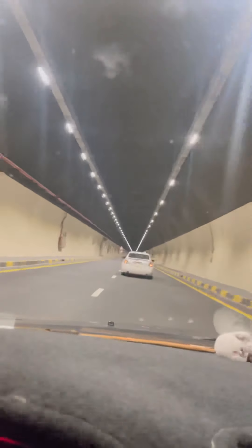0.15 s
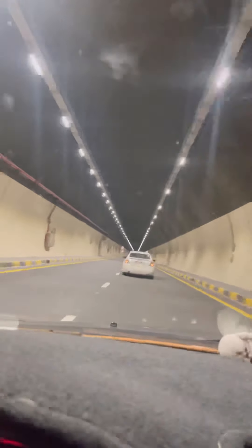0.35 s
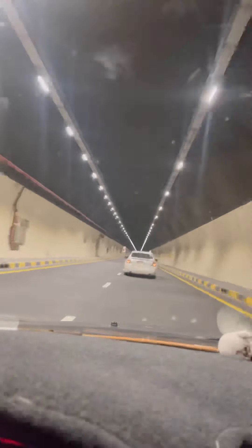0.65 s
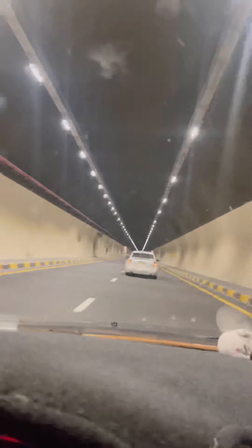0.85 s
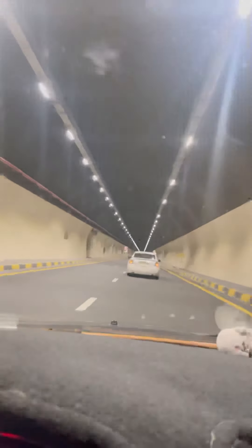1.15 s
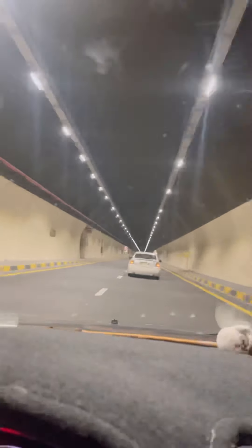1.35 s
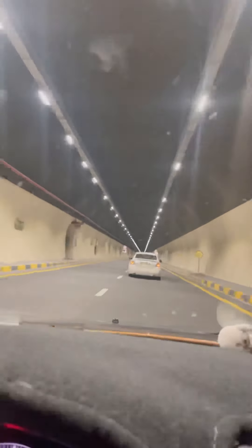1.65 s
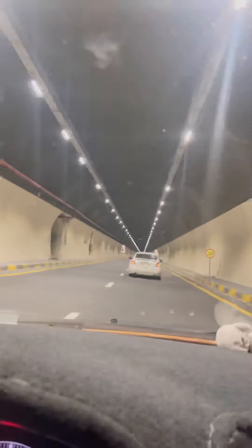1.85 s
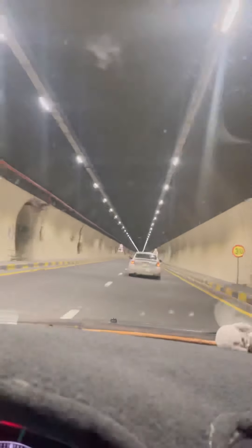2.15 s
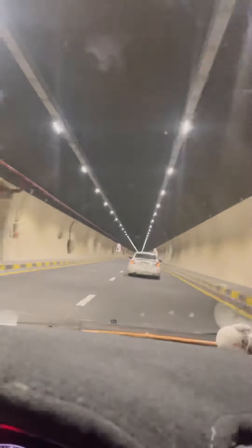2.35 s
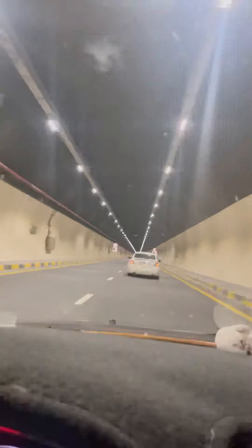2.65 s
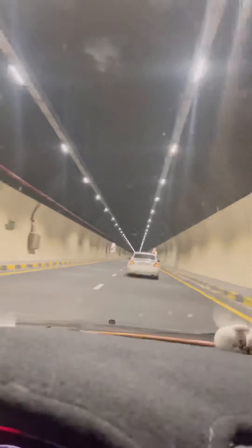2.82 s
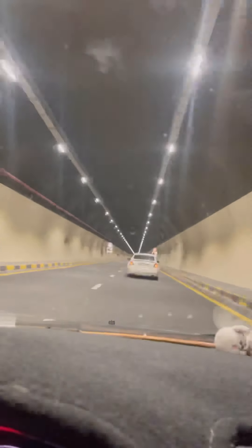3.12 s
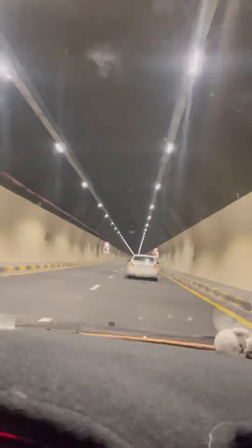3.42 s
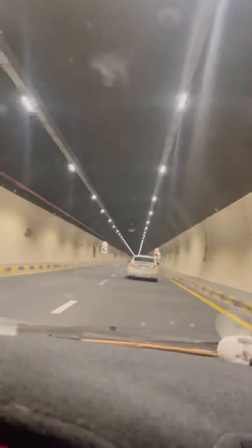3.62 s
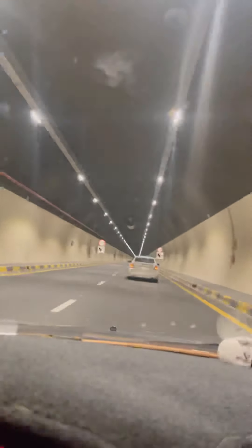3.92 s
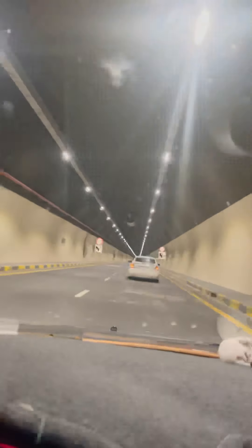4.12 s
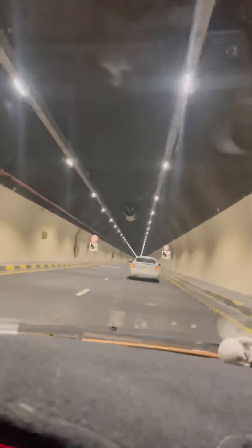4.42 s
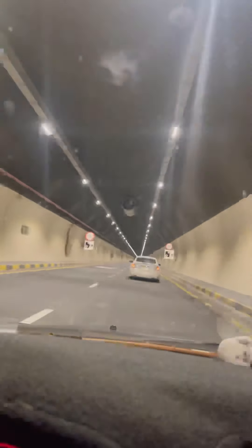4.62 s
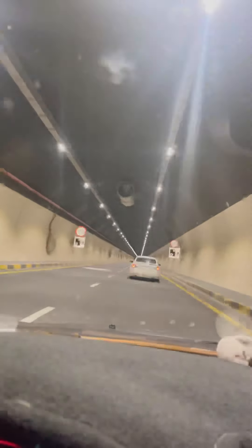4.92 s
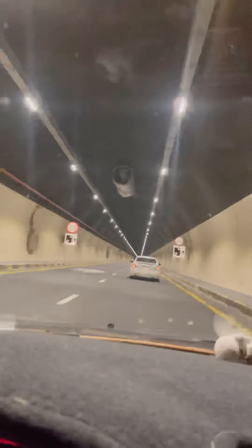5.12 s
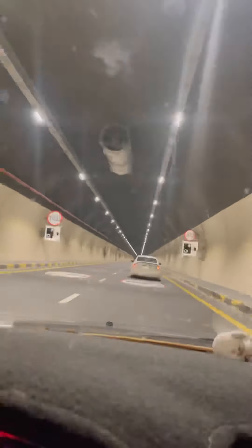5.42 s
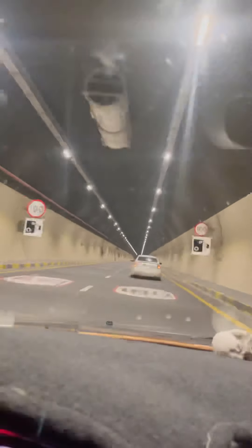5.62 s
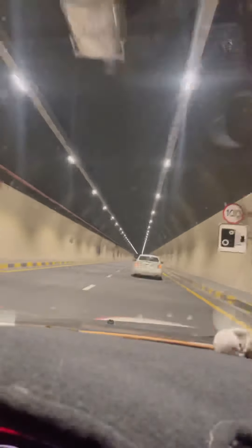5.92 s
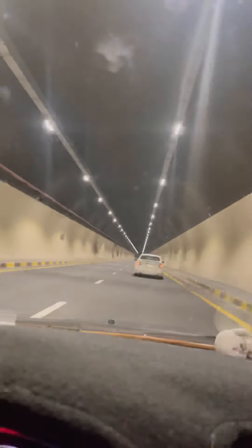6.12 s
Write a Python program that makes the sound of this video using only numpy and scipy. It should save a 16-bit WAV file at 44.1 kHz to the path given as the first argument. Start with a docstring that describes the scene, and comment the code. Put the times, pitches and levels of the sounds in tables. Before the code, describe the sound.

Continuous bass-heavy driving rumble fills a closed car cabin, wavering with the asphalt, with dull thumps, a humming engine and wheels, and only a thin soft hiss on top. A faint airy whine slowly grows as a ceiling fan approaches and passes overhead late. The microphone is close to the dashboard, catching small plastic ticks, slight rubbing, then a brief hollow rattle and snap around six seconds.

```python
"""A deep, uneven rumble runs throughout: a car in a long road tunnel, heard from behind the windscreen.
Asphalt drives shaped noise for floor boom, panel drone and tyre roar; ridges add short low jolts.
Engine and wheels hum as wandering harmonics. A whine, perhaps a ceiling fan, grows until it passes overhead.
Close by, plastic clicks as ringing modes and something brushes softly as grainy noise.
Near the end the dashboard knocks in short resonant bursts and a clip snaps."""
import sys
import numpy as np
from scipy import signal
from scipy.fft import rfft, irfft, next_fast_len
from scipy.io import wavfile
from scipy.ndimage import uniform_filter1d

SR = 44100
rng = np.random.default_rng(int(sys.argv[2]) if len(sys.argv) > 2 else 0)


def transcribe(signal):
    """Save signal, clipped to [-1, 1], as a 16-bit WAV file at the path in sys.argv[1]."""
    frames = np.atleast_2d(signal).T
    limited = np.clip(frames, -1, 1)
    pcm = np.round(limited * 32767).astype(np.int16)
    wavfile.write(sys.argv[1], SR, pcm)


N = 276066
TIME = np.arange(N) / SR
HZ = np.maximum(np.fft.rfftfreq(next_fast_len(N, True), 1 / SR), 1)
SIDES = np.array([[1], [-1]])  # left, right


def from_db(db):
    """Decibels to gain."""
    return 10 ** (np.asarray(db) / 20)


def rms_one(x):
    """Scale to unit power."""
    return x / np.sqrt(np.mean(x ** 2) + 1e-20)


def in_time(rows):
    """A curve of (time, value) joined by straight lines at every sample."""
    seconds, value = np.transpose(rows)
    return np.interp(TIME, seconds, value)


def at_hz(points):
    """A table joined by straight lines over log frequency."""
    hz, value = np.transpose(points)
    return np.interp(np.log(HZ), np.log(hz), value)


def colour(points):
    """Gain of a spectrum table, falling steeply beyond its ends."""
    low_hz, high_hz = points[0][0], points[-1][0]
    skirts = np.minimum(HZ / low_hz, 1) * np.minimum(high_hz / HZ, 1)
    return from_db(at_hz(points)) * skirts ** 6


def resonance(hz, width_hz):
    """Gain of a resonance with steep skirts, halved one width away from its centre."""
    return 1 / (1 + ((HZ - hz) / width_hz) ** 2)


def white(count):
    """Spectra of unrelated white noises."""
    return rng.standard_normal((count, len(HZ))) + 1j * rng.standard_normal((count, len(HZ)))


def drift(rate_hz):
    """Random curve of unit power that varies at about the given rate."""
    return rms_one(irfft(white(count=1)[0] * resonance(0, rate_hz))[:N])


def cabin_noise(gain):
    """Stereo noise of a given colour: alike on both sides in the bass, diffuse in the treble."""
    # how alike the two ears of the microphone are: pitch_hz, likeness (0 to 1)
    likeness = [(40, 0.99), (220, 0.99), (400, 0.98), (620, 0.86), (1300, 0.87), (1900, 0.59), (2300, 0.43),
                (2700, 0.27), (5000, 0.027)]
    # level difference between the ears: pitch_hz, left_minus_right_db
    balance = [(35, -4.5), (75, 2), (140, 1.5), (220, -0.2), (400, 2.5), (600, 3.5), (850, 2.5),
               (1100, -0.5), (3000, 0.5), (5000, -1)]
    # phase difference between the ears: pitch_hz, left_leads_rad
    lead = [(200, 0), (450, -0.34), (750, -0.47), (1100, -0.68), (1500, 0.78), (1950, 0.16), (2400, 0.72),
            (3000, -0.36)]
    mid, side = white(count=2)
    alike = at_hz(likeness)
    pair = np.sqrt(1 + alike) * mid + np.sqrt(1 - alike) * side * SIDES
    ear_gain = from_db(SIDES * at_hz(balance) / 2)
    ear_phase = np.exp(1j * SIDES * at_hz(lead) / 2)
    return rms_one(irfft(pair * ear_gain * ear_phase * gain)[:, :N])


def close_by(x):
    """A small source next to the microphone: its treble reaches the two ears out of step."""
    # pitch_hz, left_leads_rad
    close_lead = [(6300, 0), (8000, 1.5), (9400, 3.1), (10200, 4.2), (11400, 6)]
    spectrum = rfft(x, 2 * (len(HZ) - 1))
    return irfft(spectrum * np.exp(1j * SIDES * at_hz(close_lead) / 2))[:, :N]


def steady(x, seconds):
    """Even out a noise to unit power over a sliding window."""
    power = uniform_filter1d(np.mean(x ** 2, axis=0), max(int(seconds * SR), 1))
    return x / np.sqrt(power + 1e-12)


def below(x, hz):
    """The part of a sound under the given frequency."""
    return signal.sosfiltfilt(signal.butter(2, hz, fs=SR, output="sos"), x)


def jolted(boom):
    """Each ridge heaves the floor for a cycle or two and briefly unloads the wheel."""
    # ridges in the asphalt that jolt the floor: centre_s, peak_db, pitch_hz
    ridges = [(0.224, -8, 94), (0.543, -16.5, 80.4), (0.840, -9.5, 71), (1.092, -10.5, 74.5),
              (2.729, -11, 66.6), (3.67, -10.5, 78), (3.946, -9.5, 70), (4.05, -9, 99.3), (4.825, -12, 80),
              (4.929, -12, 64), (5.74, -9, 56), (5.891, -8.5, 56), (6.226, -9.5, 78)]
    jolt_s = 0.013  # from the peak down to 1/e on either side
    unload = 0.43  # share of the boom's amplitude lost at the peak
    out = boom.copy()
    for centre_s, peak_db, pitch_hz in ridges:
        near = slice(*np.searchsorted(TIME, [centre_s - .06, centre_s + .06]))
        age = TIME[near] - centre_s
        lift = np.exp(-(age / jolt_s) ** 2)
        thump = from_db(peak_db) * lift * np.cos(2 * np.pi * pitch_hz * age)
        out[:, near] = out[:, near] * (1 - unload * lift) + thump
    return out


def body(road_db):
    """Uneven asphalt makes the floor boom and the panels drone; the deepest part surges on its own."""
    # spectrum of the floor boom: pitch_hz, density_db (relative, per Hz)
    boom_spectrum = [(16, -33), (25, -22), (31, -15.5), (39, -5.5), (50, -1.5), (68, 1), (86, -1),
                     (104, .5), (130, -2.5), (146, -10), (200, -30)]
    # spectrum of the panel drone: pitch_hz, density_db (relative, per Hz)
    drone_spectrum = [(110, -16.5), (148, -5), (160, 5), (180, 2.5), (203, -5.5), (222, -10), (238, -8.5),
                      (270, -7), (315, -11), (380, -29), (600, -69.5)]
    # long dips in the road make the body heave, shifting the deep boom: time_s, change_db
    heave = [(0, 0.5), (0.9, -2.5), (1.6, 3), (2.3, -1), (3.4, 2), (4.1, -2.2), (4.7, 1.5), (5.3, 3),
             (5.75, 2), (6.2, 4)]
    # changes in the panels' drone: time_s, change_db
    panels = [(0, 0.5), (0.4, 0), (0.6, 0.5), (1.15, -0.5), (1.45, -0.5), (1.75, 0), (2.2, -0.5), (2.7, 1),
              (3.02, -0.5), (3.2, 2), (3.6, 0), (4.0, -2), (4.4, -1), (4.83, 2.5), (5.15, -1), (5.5, -0.5),
              (6.25, 1.5)]
    heave_hz = 68  # the heave acts below this
    # level on usual asphalt, and dB gained per dB of roughness
    boom_db, boom_follows = -20, 1.7
    drone_db, drone_follows = -25.5, 1.3

    boom = steady(cabin_noise(colour(boom_spectrum)), seconds=0.18)
    boom = from_db(boom_db + boom_follows * road_db) * boom
    deep = below(boom, heave_hz)
    heaving = from_db(in_time(heave)) * deep + (boom - deep)

    drone = steady(cabin_noise(colour(drone_spectrum)), seconds=.25)
    drone = from_db(drone_db + drone_follows * road_db + in_time(panels)) * drone
    return jolted(heaving) + drone


def hum(base_hz, orders, wander, flutter_db):
    """Multiples of a slightly wandering rotation, each fluttering in strength."""
    turns = np.cumsum(base_hz * (1 + wander * drift(0.98))) / SR
    out = np.zeros(N)
    for multiple, level_db in orders:
        tone = np.sin(2 * np.pi * (multiple * turns + rng.random()))
        out += from_db(level_db) * rms_one(from_db(flutter_db * drift(0.7)) * tone)
    return out


def drivetrain():
    """The engine's firing, stronger under load, and the turning of slightly uneven wheels."""
    # harmonics of the firing: multiple, level_db (before the load)
    engine_orders = [(2, -37), (3, -38), (4, -44), (5, -52)]
    # harmonics of the wheel rotation: multiple, level_db
    wheel_orders = [(4, -33), (6, -29), (19, -44)]
    # the driver leans on the throttle: time_s, change_db
    load = [(0, -12.5), (0.9, -1), (1.9, -2.5), (3.4, 0), (4.4, -1.2), (6.25, 6)]
    firing_hz, wheel_hz = 77.8, 13.33
    engine = from_db(in_time(load)) * hum(firing_hz, engine_orders, wander=.003, flutter_db=3.0)
    wheels = hum(wheel_hz, wheel_orders, wander=0.0033, flutter_db=2.0)
    return (engine + wheels) * from_db(SIDES * 0.36)  # slightly to the left


def wavering(x, share):
    """Let the pitch of a stereo sound wander by a small share around its mean."""
    sway = drift(1.5)
    warped = TIME + np.cumsum(share * (sway - sway.mean())) / SR
    return np.array([np.interp(warped, TIME, side) for side in x])


def unsteady_top(x):
    """Vary the level of a hiss's top quickly at random."""
    spread_db, rate_hz, split_hz = 1.8, 35, 4600
    low = below(x, split_hz)
    return low + from_db(spread_db * drift(rate_hz)) * (x - low)


def tyres(road_db):
    """Tread noise rings in the cabin and swells on rough asphalt; its hiss ignores the road
    and is slightly unsteady above 4.6 kHz."""
    # spectrum of the roar: pitch_hz, density_db (relative, per Hz)
    roar_spectrum = [(230, -42), (320, 0.5), (385, 1), (455, -4), (520, -4), (580, -7.5), (780, -10),
                     (920, -13.5), (1200, -23), (2000, -54)]
    # spectrum of the hiss: pitch_hz, density_db (relative, per Hz)
    hiss_spectrum = [(600, -11), (1020, 5), (1170, -0.5), (1380, 0.5), (1750, -8.5), (2250, -9.5),
                     (2750, -13.5), (3400, -19), (4200, -24.5), (5200, -33.5), (6700, -35.5), (8200, -54.5),
                     (12000, -38.5)]
    # cabin and window resonances: pitch_hz, width_hz, level_db (against the roar), left_minus_right_db
    cabin = [(541.3, 11, -11, -1.5), (707.8, 15, -14.5, 2.5), (862, 37, -13.5, 0.5), (1325, 40, -28, 0.5),
             (502, 9.3, -15.5, 3), (379.2, 12, -10, 0.5), (314.6, 6.4, -12, 0.5)]
    # patches of asphalt that excite one resonance: centre_s, rise_db, resonance number (from 0)
    swells = [(0.72, 5.5, 1), (1.22, 6, 0), (1.8, 3.5, 2), (2.1, 5, 1), (6.15, 4, 2), (6.15, 4, 3)]
    # the roar above the growl as the surface changes: time_s, change_db
    tread = [(0, 0.5), (0.6, -2), (1.3, 2), (2.2, 0), (3.2, 1), (3.9, -2.5), (4.6, -2.5), (5.3, 0.5),
             (6.25, -0.5)]
    # the roar's low growl: time_s, change_db
    growl_curve = [(0, 0.5), (0.35, 3.5), (0.45, 2), (0.55, 6.5), (0.75, 2), (1.2, 0), (1.45, -7),
                   (1.6, -3), (2.0, 1.5), (2.8, 1), (3.2, -1), (3.62, 1), (3.92, -2), (4.3, 3), (4.55, 0.5),
                   (4.82, 3.5), (5.2, 1), (5.39, -3.5), (5.54, 2), (5.8, -1.5), (6.12, 3.5), (6.25, -0.5)]
    swell_s = 0.33  # from the peak down to 1/e on either side
    ring_wander = 0.01078  # share by which the resonances wander in pitch
    growl_hz = 444  # upper edge of the growl
    roar_db, roar_follows = -33.5, 0.47  # level on usual asphalt, dB gained per dB of roughness
    hiss_db = -44  # before its top is varied

    roar = steady(cabin_noise(colour(roar_spectrum)), seconds=0.27)
    for number, (hz, width_hz, level_db, pan_db) in enumerate(cabin):
        swell_db = np.zeros(N)
        for centre_s, rise_db, which in swells:
            if which == number:
                swell_db += rise_db * np.exp(-((TIME - centre_s) / swell_s) ** 2)
        ring = steady(cabin_noise(resonance(hz, width_hz)), seconds=0.39)
        ring = wavering(ring, ring_wander)
        roar = roar + from_db(level_db + swell_db + SIDES * pan_db / 2) * ring
    roar = from_db(roar_db + roar_follows * road_db) * rms_one(roar)

    growl = below(roar, growl_hz)
    upper = roar - growl
    hiss = from_db(hiss_db) * unsteady_top(cabin_noise(colour(hiss_spectrum)))
    return from_db(in_time(growl_curve)) * growl + from_db(in_time(tread)) * upper + hiss


def fan():
    """A narrow airy whine that carries down the tunnel, and a wide air rush that fades faster with distance."""
    # spectrum of the rushing air: pitch_hz, density_db (relative, per Hz)
    rush_spectrum = [(800, -2), (1300, 3.5), (2500, -10), (4500, -24), (8000, -34)]
    speed_m_per_s, pass_s, height_m = 18, 5.85, 8.2
    overhead_db, loss_db_per_doubling = -55, 2.5  # the tunnel carries the whine, so it fades slowly
    flutter_db = 1.8
    rush_db = -52  # right below the fan
    distance_m = np.hypot(height_m, speed_m_per_s * (TIME - pass_s))
    nearness = height_m / distance_m
    whine_db = overhead_db + loss_db_per_doubling * np.log2(nearness) + flutter_db * drift(6)
    whine = resonance(hz=2305, width_hz=31) + from_db(-9.0) * resonance(hz=2150, width_hz=130)
    rush = from_db(rush_db) * nearness * cabin_noise(colour(rush_spectrum))
    return from_db(whine_db) * cabin_noise(whine) + rush


def plastic():
    """Each click is a crack that rings the part's modes; nearby surfaces scatter a short tail."""
    # plastic trim clicking: start_s, level_db (before a common 10 dB cut)
    clicks = [(0.114, -65), (1.932, -55), (2.27, -68), (2.715, -64), (3.057, -68), (5.315, -58),
              (5.3893, -35), (5.3906, -36), (5.403, -54), (6.222, -60)]
    # modes of the plastic part: pitch_hz, level_db (within the click), t60_s
    part_modes = [(1800, -1.5, .012), (2300, 0, .014), (2740, -1.5, 0.027), (3820, 1, .02),
                  (4330, 2, 0.018), (5730, -0.5, 0.02), (6570, 2, 0.018), (7420, -0.5, 0.022),
                  (8300, 2, 0.018), (8870, 6.5, 0.017), (9650, -1, 0.021), (10160, 7, 0.019),
                  (11420, 5, .02)]
    crack_db, crack_t60_s = 9, .007  # the contact itself, within the click
    scatter_db, scatter_t60_s = -4, 0.063  # its spray off nearby surfaces
    t = TIME[:SR // 8]
    out = np.zeros(N + len(t))
    for start_s, level_db in clicks:
        modes = np.zeros(len(t))
        for hz, mode_db, t60_s in part_modes:
            modes += from_db(mode_db - 60 * t / t60_s) * np.sin(2 * np.pi * (hz * t + rng.random()))
        crack = from_db(crack_db - 60 * t / crack_t60_s)
        scatter = from_db(scatter_db - 60 * t / scatter_t60_s)
        burst = (crack + scatter) * rng.standard_normal(len(t))
        start = round(start_s * SR)
        out[start:start + len(t)] += from_db(level_db - 10.0) * (modes + burst)
    return close_by(out[:N])


def brushes():
    """Friction hiss, grainy from catching fibres, that swells and fades with each stroke."""
    # soft strokes on fabric: centre_s, half_s (peak to 1/e), peak_db, top_hz
    strokes = [(1.3, 0.09, -68.5, 8000), (1.35, 0.04, -65, 11000), (1.43, 0.062, -57, 11000),
               (3.79, .04, -73, 7060), (4.426, 0.01, -63.5, 5800), (4.452, 0.026, -61.5, 5800),
               (4.8, 0.077, -73, 7200), (5.33, 0.039, -67, 11000), (6.175, .09, -67, 9000)]
    # spectrum of the friction: pitch_hz, density_db (relative, per Hz)
    fabric = [(2800, -1), (4300, 2), (5700, -1), (7400, -3), (8800, 2.5), (10400, 3), (11400, 0)]
    grain_db, grain_rate_hz = 2.3, 110
    out = np.zeros(N)
    for centre_s, half_s, peak_db, top_hz in strokes:
        band = colour(fabric) * (1 + (HZ / top_hz) ** 16) ** -.5
        friction = irfft(white(count=1)[0] * band)[:N]
        friction = rms_one(friction * from_db(grain_db * drift(grain_rate_hz)))
        out += from_db(peak_db) * np.exp(-((TIME - centre_s) / half_s) ** 2) * friction
    return close_by(out)


def knocks():
    """A loose panel is jolted: a cluster of close modes, made as narrow noise, dies quickly."""
    # dashboard knocking as the wheels cross road paint: start_s, level_db (before onset), pitch_hz, t60_s
    hits = [(6.002, -43, 2280, 0.061), (6.090, -37, 2290, 0.035), (6.119, -41.5, 2250, 0.1),
            (6.153, -37, 1520, 0.11), (6.156, -44.5, 2290, 0.12), (6.096, -45.5, 2980, 0.055),
            (6.166, -41, 1480, 0.08)]
    width = 0.073  # of the pitch
    out = np.zeros((2, N))
    for start_s, level_db, hz, t60_s in hits:
        age = np.maximum(TIME - start_s, 0)
        onset = 1 - np.exp(-age / 0.0013)  # also silences the time before the hit
        cluster = steady(cabin_noise(resonance(hz, width * hz)), seconds=0.017)
        out += from_db(level_db - 60 * age / t60_s) * onset * cluster
    return out


def snap():
    """The panel snaps back: its stiff clip lets go and rings for a few cycles, one dry tick."""
    start_s, hz, t60_s = 6.1677, 3000, .002
    level_db = -26.5  # before the band-pass
    age = np.maximum(TIME - start_s, 0)
    ring = from_db(level_db - 60 * age / t60_s) * np.sin(2 * np.pi * hz * age)
    band = signal.butter(2, [2300, 4800], "band", fs=SR, output="sos")
    return close_by(signal.sosfilt(band, ring))


def scene():
    """Everything that reaches the dashboard."""
    # roughness of the asphalt under the car: time_s, roughness_db (against the usual)
    road = [(0.0, 0.5), (0.2, 1.5), (0.36, -0.2), (0.56, 1.15), (1.4, -1), (1.88, 1), (2.08, -1.1),
            (2.32, 0.5), (3.0, -0.2), (3.32, 0.6), (3.8, 0.3), (4.04, 1.5), (4.32, 0), (4.84, 1),
            (5.48, -1.1), (5.72, 0), (6.04, -2.5), (6.24, 2.5)]
    road_db = in_time(road)
    ride = body(road_db) + drivetrain() + tyres(road_db)
    return ride + fan() + plastic() + brushes() + knocks() + snap()


def record(dry):
    """A very short fade-in, then the top is cut steeply."""
    cutoff_hz = 12000
    opening = np.minimum(TIME / .008, 1)
    low_pass = signal.ellip(10, .1, 80, cutoff_hz, fs=SR, output="sos")
    return signal.sosfilt(low_pass, dry * opening)


dry = scene()
out = record(dry)
transcribe(out)
```